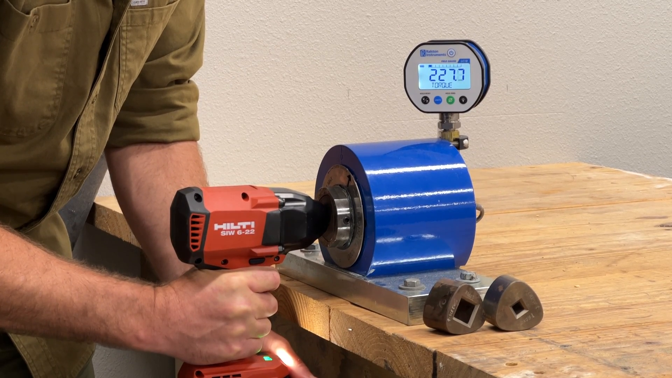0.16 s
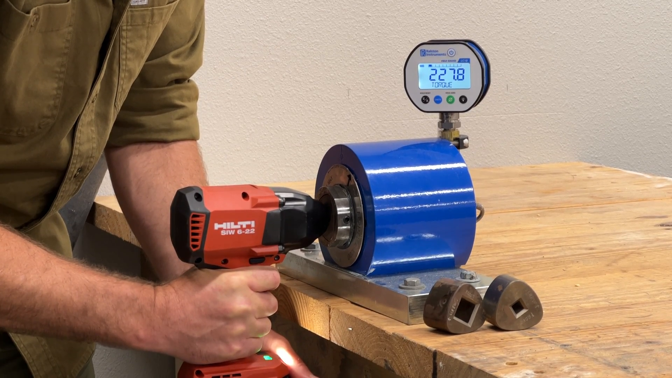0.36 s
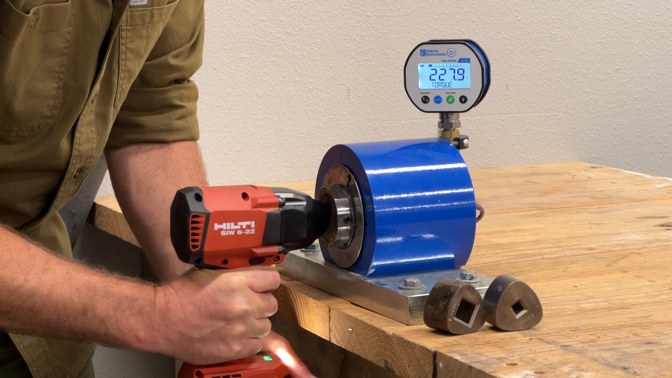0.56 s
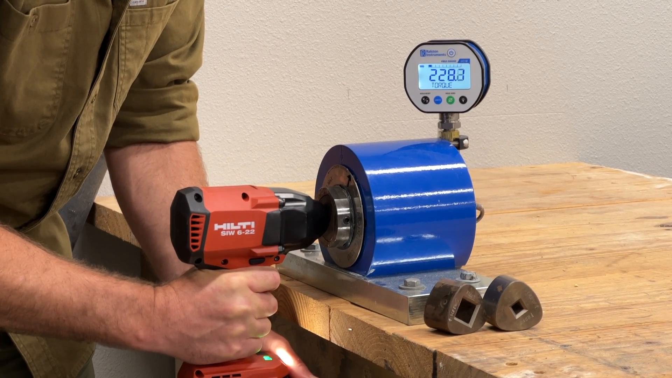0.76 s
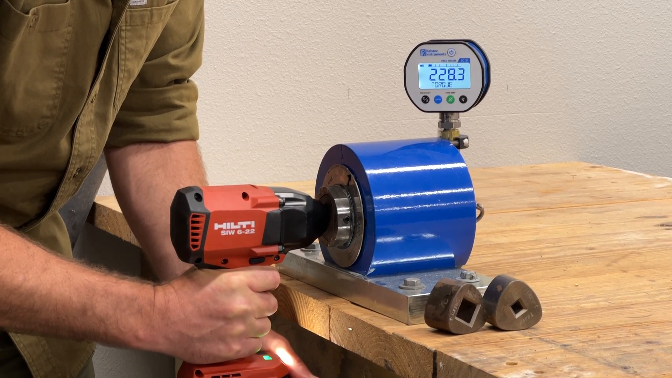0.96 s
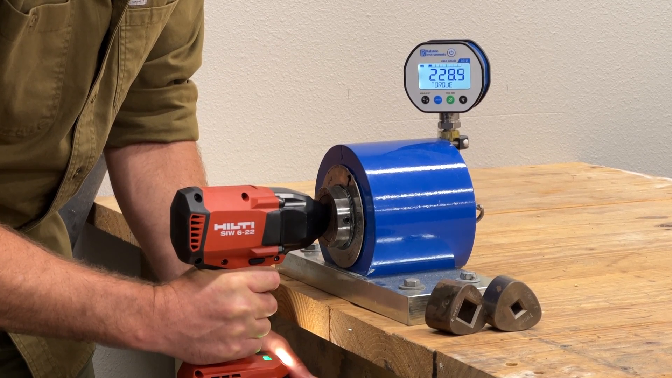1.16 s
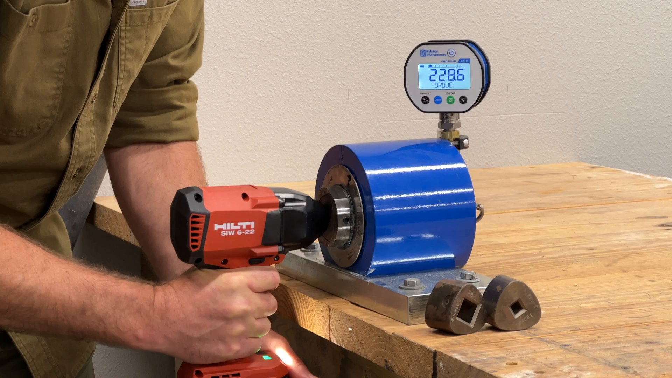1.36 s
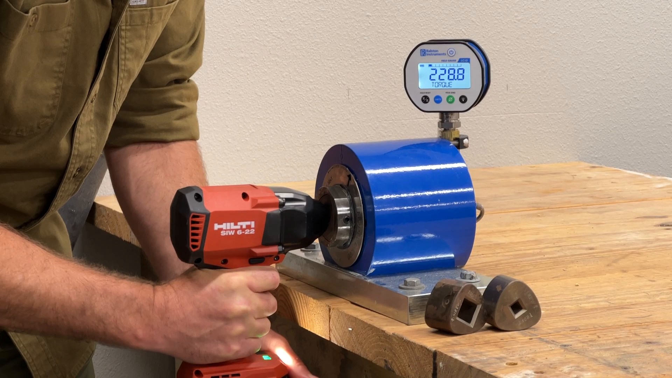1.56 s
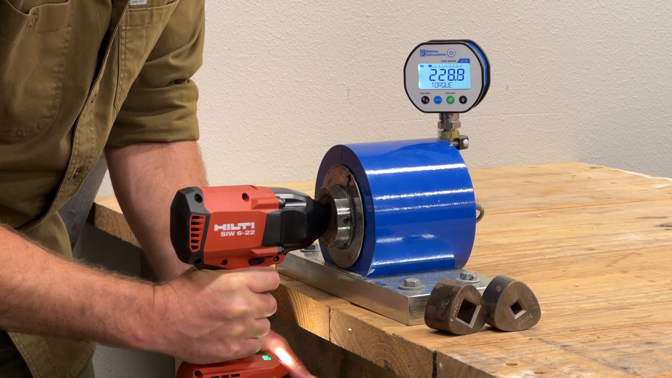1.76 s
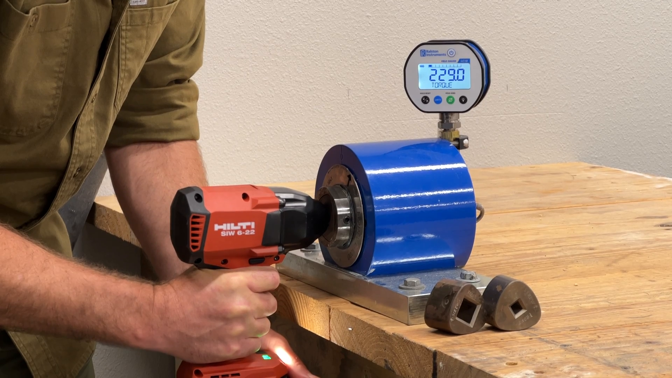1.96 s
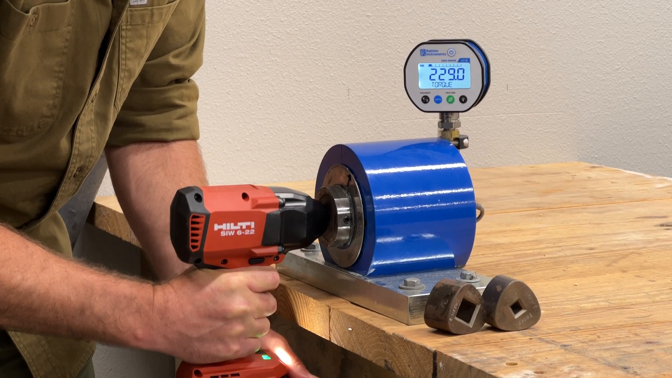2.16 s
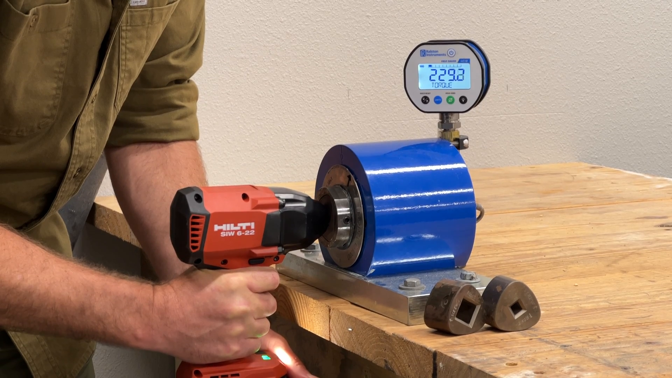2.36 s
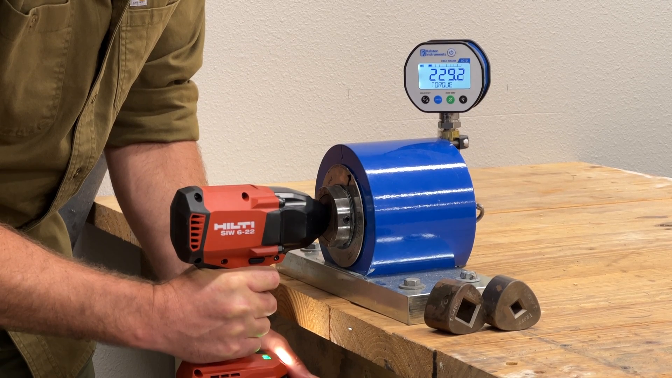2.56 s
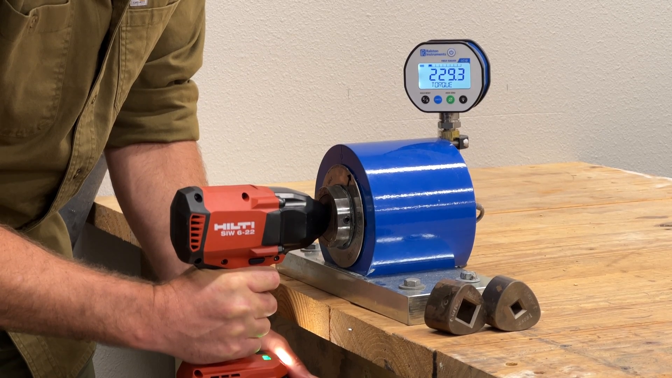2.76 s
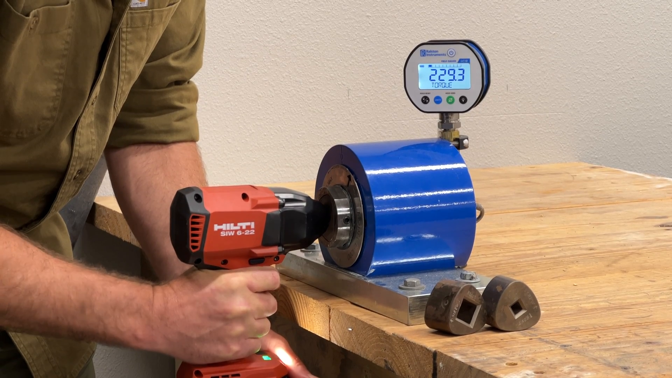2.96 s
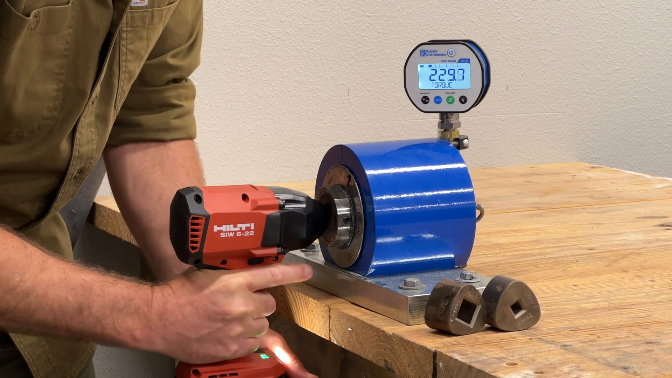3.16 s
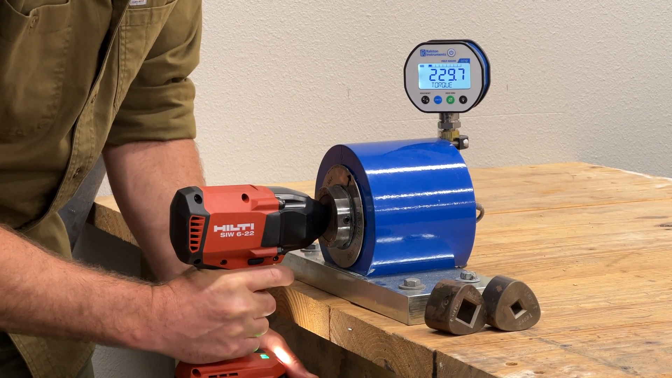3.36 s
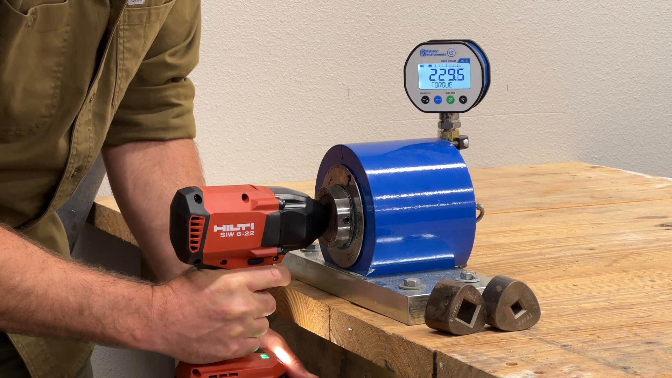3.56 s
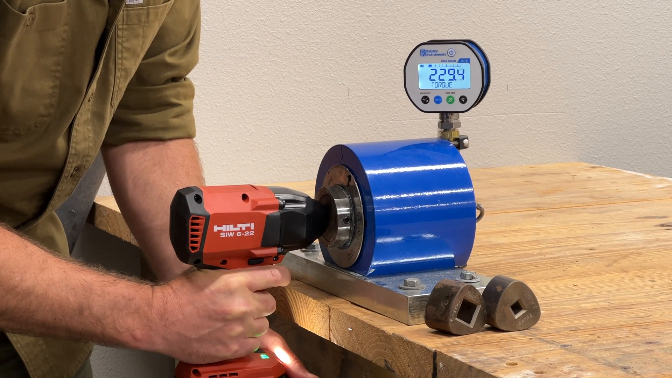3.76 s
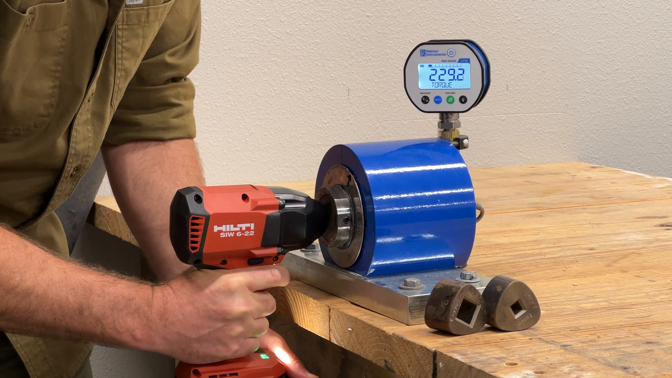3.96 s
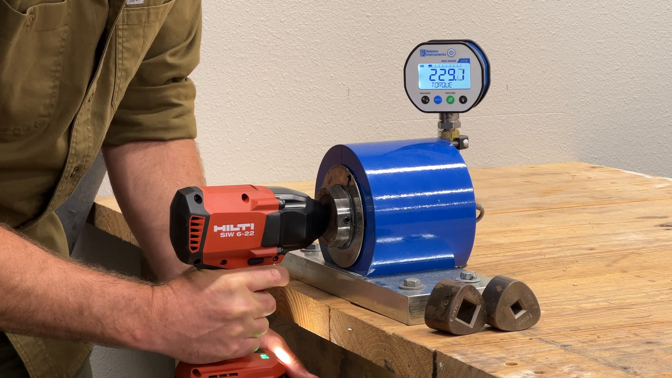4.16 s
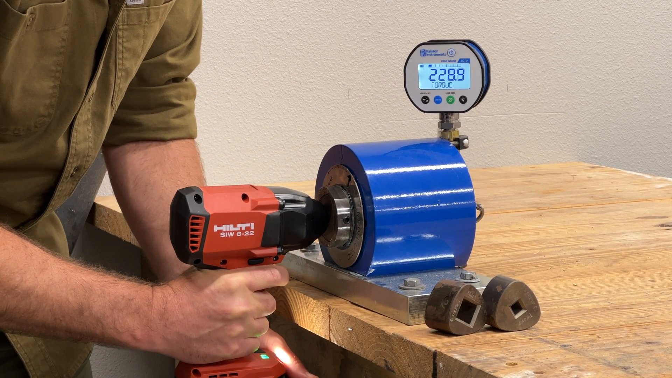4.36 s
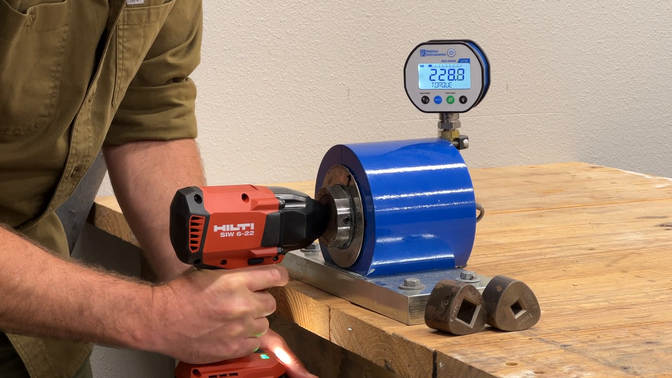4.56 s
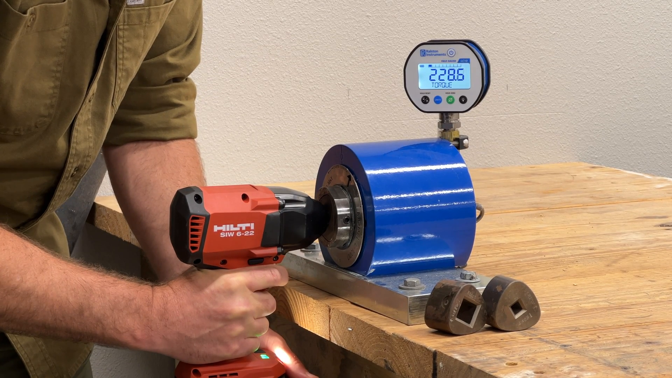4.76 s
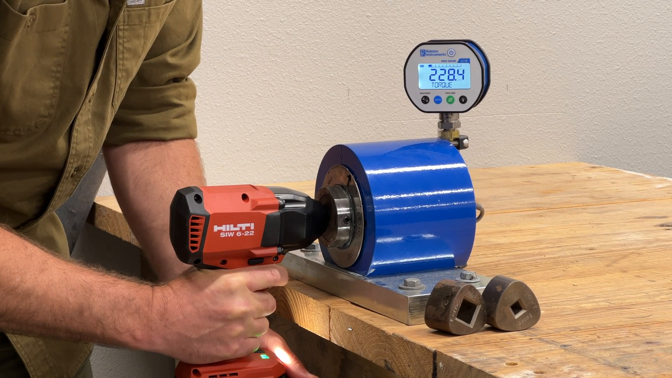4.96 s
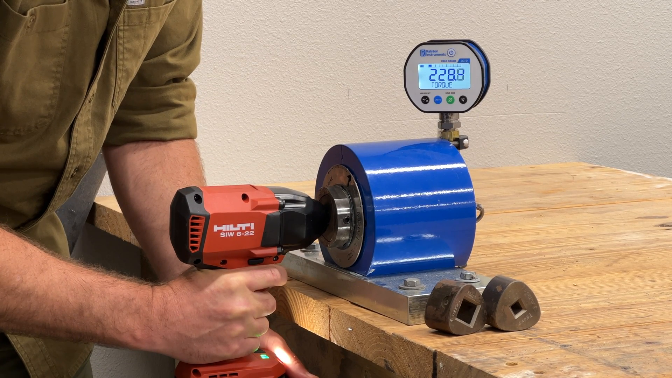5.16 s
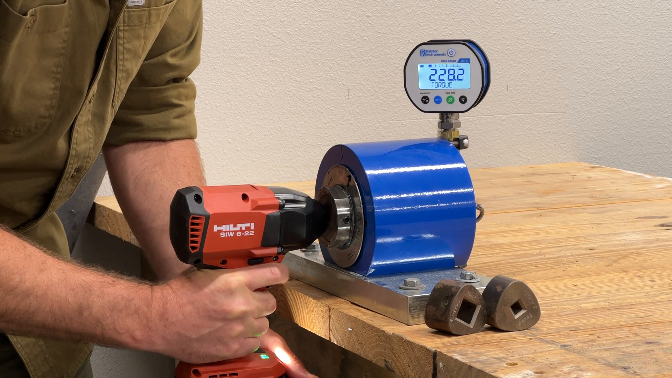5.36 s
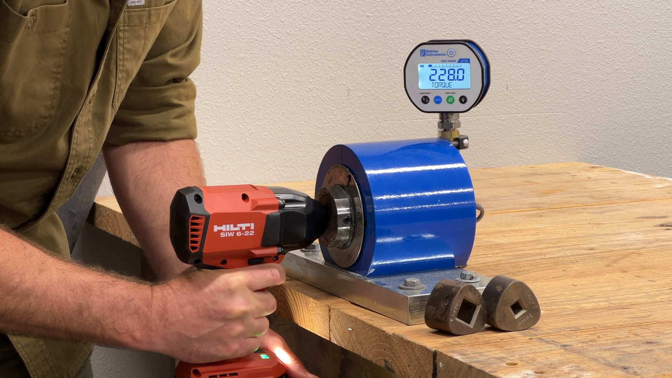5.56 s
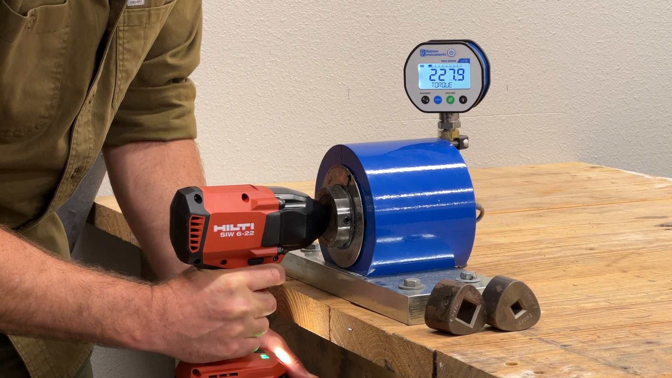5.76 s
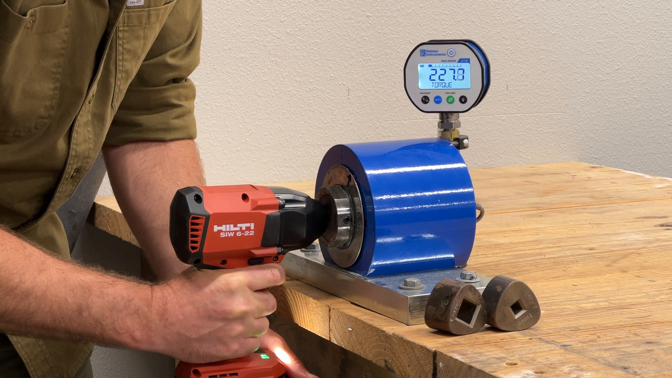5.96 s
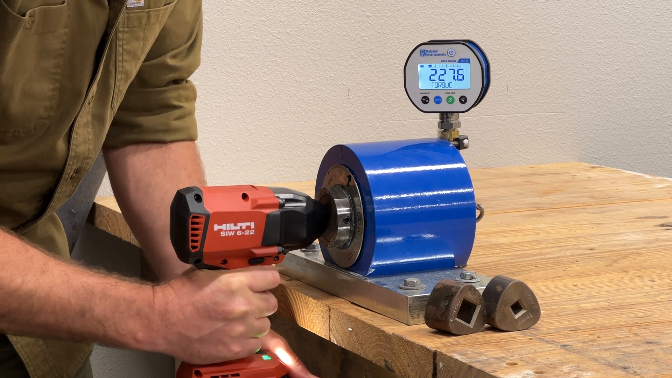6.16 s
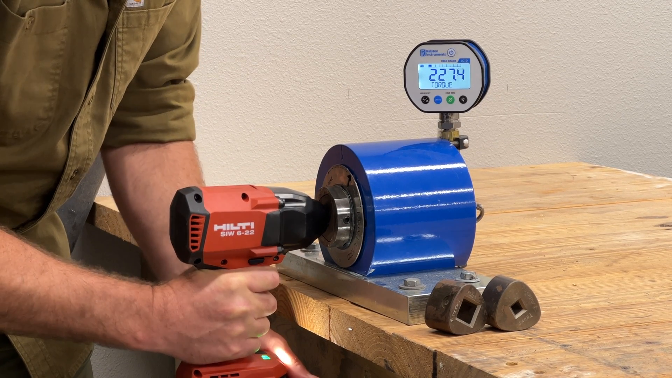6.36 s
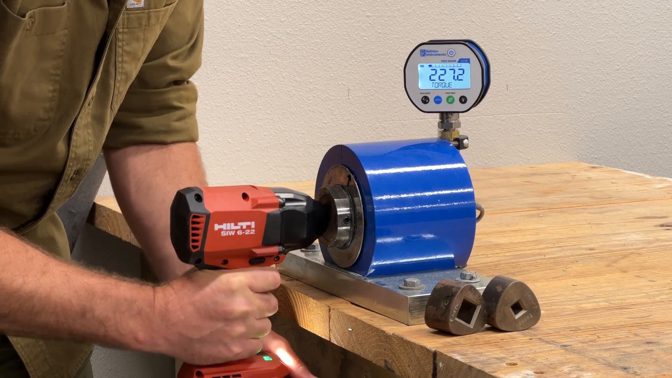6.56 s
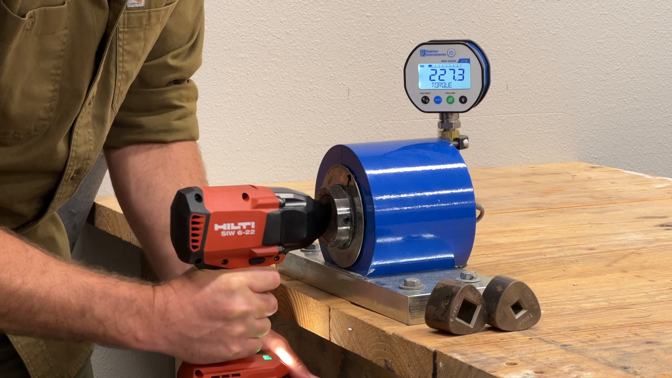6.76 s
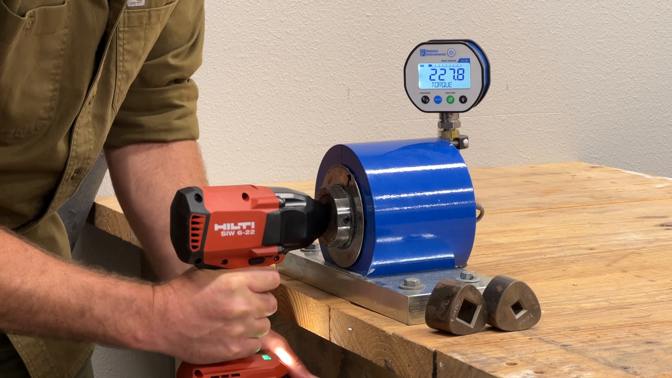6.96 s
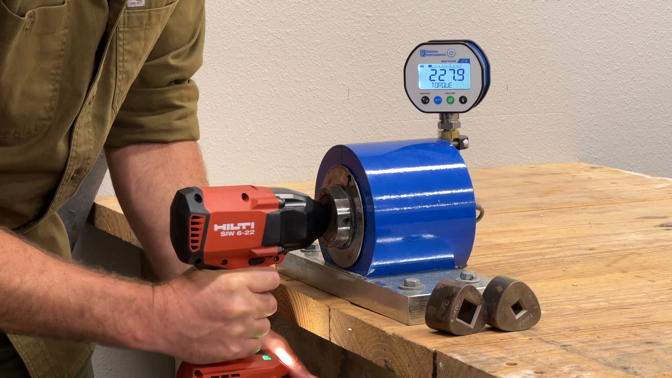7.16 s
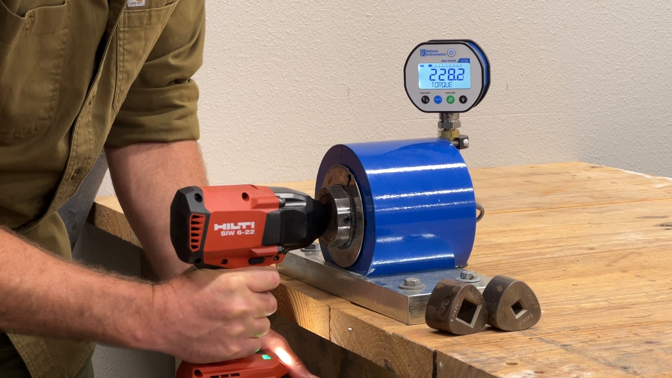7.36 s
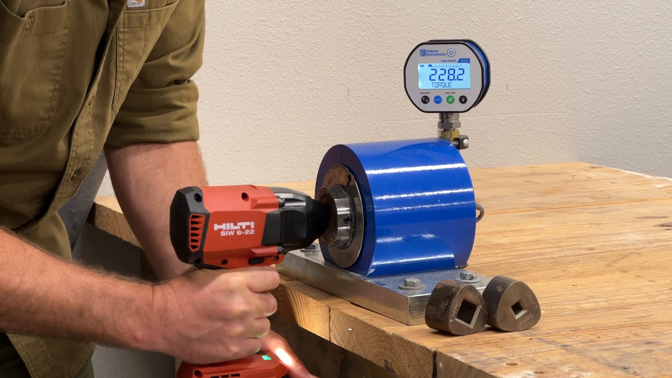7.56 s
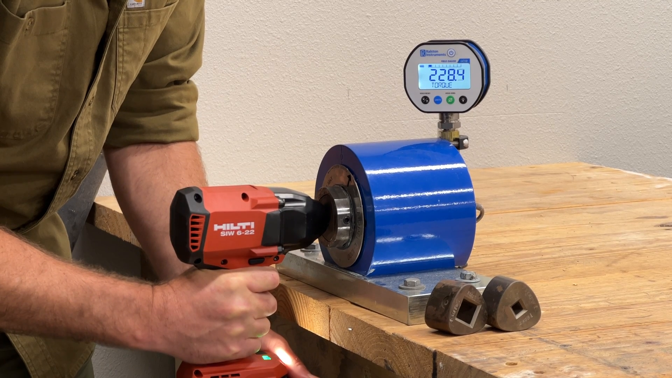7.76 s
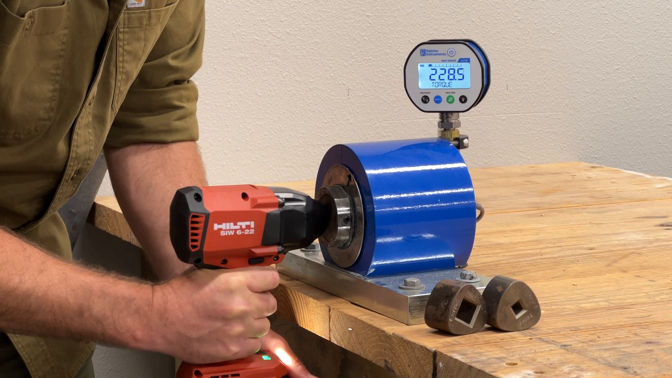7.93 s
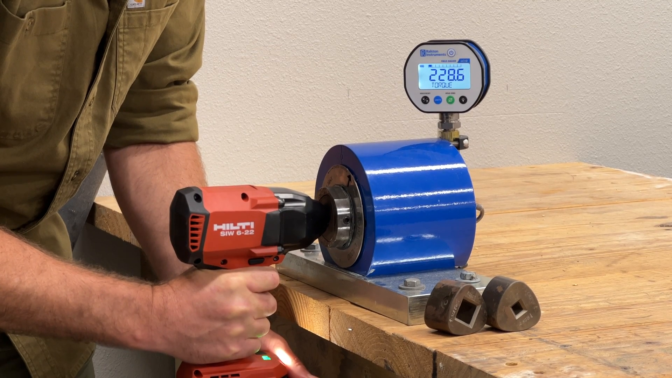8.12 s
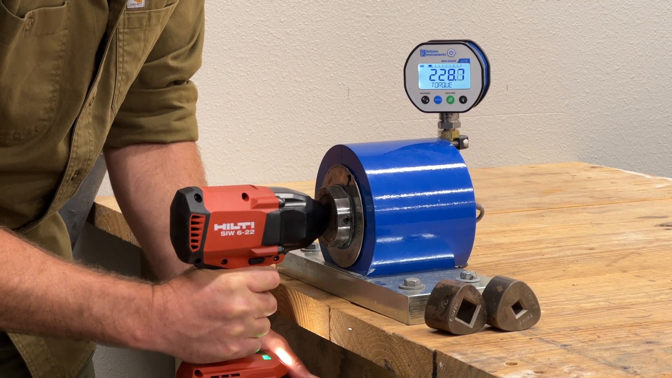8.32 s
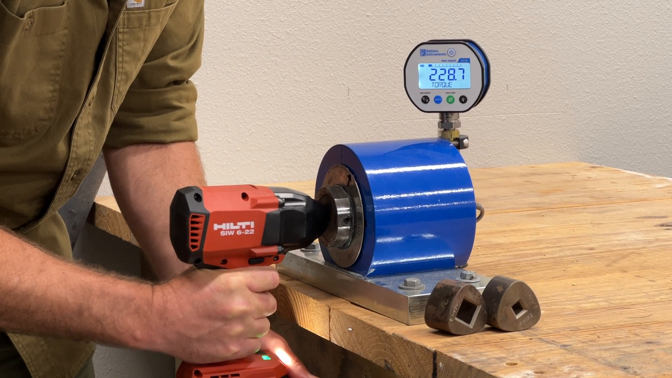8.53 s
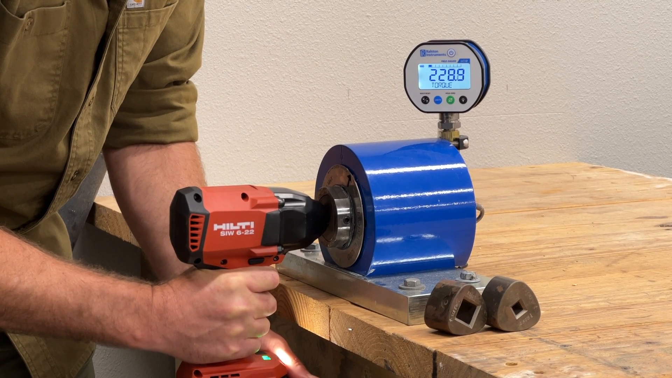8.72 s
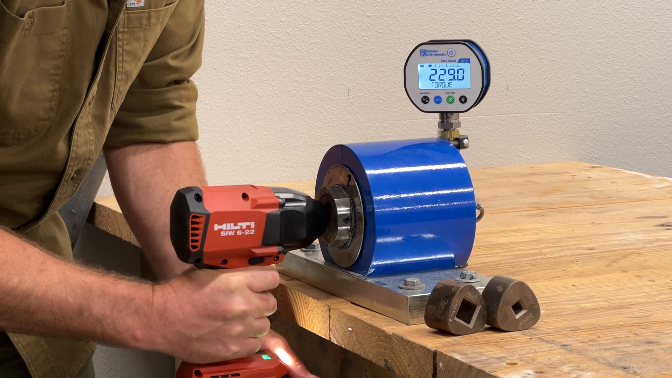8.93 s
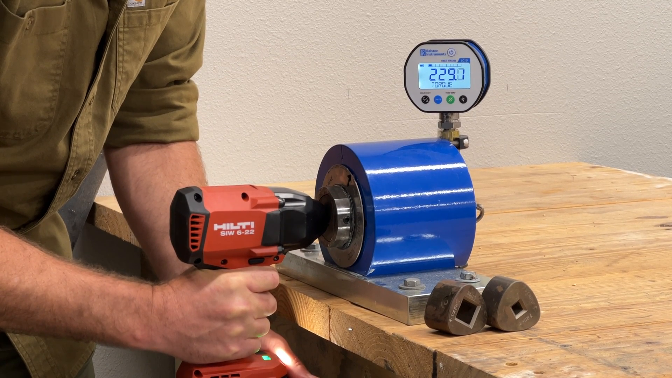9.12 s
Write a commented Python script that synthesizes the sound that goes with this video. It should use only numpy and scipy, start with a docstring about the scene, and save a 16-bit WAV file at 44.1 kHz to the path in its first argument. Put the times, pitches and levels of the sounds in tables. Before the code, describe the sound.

Two steady bursts of fast, loud steel hammering from a power wrench on a wooden bench, separated by a quiet, echoing pause with ventilation hum.

```python
"""In a live workshop, a cordless impact wrench hammers on the bolt of a tension tester clamped to a wooden bench.
Each blow, about 57 a second, excites the bench modes; the loose socket chatters on the nut until the next blow.
The hammer runs down with stray blows, the tool is shifted with clacks and ticks, and a second burst starts.
Impulses and noise drive minimum-phase resonant filters; a decaying noise tail forms the room.
Ventilation noise lies beneath, and the level of the whole scene swells and sinks between the bursts."""
import sys
import numpy as np
from scipy import signal
from scipy.fft import rfft, irfft
from scipy.io import wavfile
from scipy.ndimage import uniform_filter1d

SR = 44100
rng = np.random.default_rng(int(sys.argv[2]) if len(sys.argv) > 2 else 0)


def output_pcm(signal):
    """Save a mono or channel-first signal as 16-bit PCM at the path in sys.argv[1].

    Samples are clipped to [-1, 1] before scaling.
    """
    pcm = np.clip(np.atleast_2d(signal).T, -1, 1) * 32767
    wavfile.write(sys.argv[1], SR, np.round(pcm).astype(np.int16))


N = 409688
TIME = np.arange(N) / SR
FULL_RATE_HZ = 56.8  # blows per second at full speed

# Hammer speed in each burst, from its first blow. Each row: time in seconds, rate in blows per second.
SPEED_FIRST = [(0.002, 56.89), (0.7, 56.83), (1.5, 56.8), (2.3, 56.83), (2.97, 56.77), (3.05, 39.65),
               (3.16, 11.84)]
SPEED_SECOND = [(6.096, 42.4), (6.16, 57.18), (6.3, 56.48), (6.7, 56.96), (7.2, 56.92), (7.8, 56.77),
                (8.5, 56.75), (9.29, 56.65)]
# Seats the socket takes on the nut. Each row: start in seconds, thump level in dB,
# extra boom of the lowest bench mode in dB, chatter level in dB, drone level in dB, all relative.
SEATS = [(0, -39.5, 2.2, -38, -70), (1.7, -40, 0.5, -37, -51.5), (6, -37.5, 0.5, -33, -60.5),
         (7.15, -36.5, -1.4, -33.5, -53.5)]


def amp(db):
    """Level law: decibels to an amplitude ratio."""
    return 10 ** (np.asarray(db) / 20)


def evened(x):
    """Normalisation by effective value: scales to rms 1."""
    return x / np.sqrt(np.mean(x ** 2) + 1e-20)


def curve(rows):
    """Linear interpolation of a time table at every sample."""
    return np.interp(TIME, *np.transpose(rows))


def read(points, hz, peaks=()):
    """Source spectrum: decibels on a log-frequency axis, with resonance humps added on top."""
    f, value = np.transpose(points)
    level = np.interp(np.log(hz + 1), np.log(f + 1), value)
    for centre_hz, width_hz, db in peaks:
        level = level + db / (1 + (2 * (hz - centre_hz) / width_hz) ** 2)
    return level


def bins(size=8192):
    """Discrete spectrum: the frequencies in Hz on which filters are drawn."""
    return np.fft.rfftfreq(size, 1 / SR)


def causal(db):
    """Minimum phase: the Hilbert transform of the log gain gives a response that starts at once, energy 1."""
    log_gain = np.log(amp(np.maximum(db - db.max(), -80)))
    both_sides = np.r_[log_gain, log_gain[-2:0:-1]]
    response = np.fft.ifft(np.exp(signal.hilbert(both_sides).conj())).real
    response = response[:len(response) // 2]
    return response / np.linalg.norm(response)


def ring(x, response):
    """Linear superposition: convolves a drive with an impulse response."""
    return signal.oaconvolve(x, response)[:N]


def clicks(times, sizes):
    """Impulsive excitation: single-sample impulses at the given times in seconds."""
    places = np.clip(np.round(times * SR), 0, N).astype(int)
    return np.bincount(places, sizes, N + 1)[:N]


def crack(decay_s, spike, size=1024):
    """Impact: a sharp contact, then dense decaying ringing, with a nearly flat spectrum and energy 1."""
    t = np.arange(size) / SR
    burst = rng.standard_normal(size) * np.exp(-t / decay_s)
    burst = burst / np.linalg.norm(burst) + spike * (t == 0)
    spectrum = rfft(burst, 2 * size)
    smooth_power = uniform_filter1d(abs(spectrum) ** 2, size=12)
    burst = irfft(spectrum / np.sqrt(smooth_power))[:size]
    return burst / np.linalg.norm(burst)


def knocks(hits, decay_s, spike):
    """Isolated impacts: each hit (seconds, dB, colour in dB) is a short filtered steel crack."""
    out = np.zeros(N)
    for start_s, db, colour in hits:
        sound = amp(db) * signal.fftconvolve(crack(decay_s, spike), causal(colour))
        part = out[round(start_s * SR):][:len(sound)]
        part += sound[:len(part)]
    return out


def moments(offset, every):
    """Rate integrated to phase: times in both bursts at which the cycle, counted in blows, passes a point."""
    times = []
    for speed in (SPEED_FIRST, SPEED_SECOND):
        live = (TIME >= speed[0][0]) & (TIME <= speed[-1][0])
        blows = np.cumsum(curve(speed)[live]) / SR
        times.append(np.interp(np.arange(offset, blows[-1], every), blows, TIME[live]))
    return np.concatenate(times)


def seated(values):
    """Contact geometry: one value for each seat of the socket, sliding from seat to seat."""
    slide_s = .3
    out = values[0]
    for step, seat in zip(np.diff(values), SEATS[1:]):
        out = out + step * np.clip((TIME - seat[0]) / slide_s + .5, 0, 1)
    return out


def slack():
    """Impact strength follows speed: the share of the full speed that the hammer lacks."""
    return np.maximum(1 - curve([*SPEED_FIRST, *SPEED_SECOND]) / FULL_RATE_HZ, 0)


def envelope(rows):
    """Amplitude modulation: linear attack, hold and exponential release for each stretch (start, end, dB)."""
    attack_s, release_s = 0.02, .05
    out = 0
    for start, end, db in rows:
        rise = np.clip((TIME - start) / attack_s, 0, 1)
        out = out + amp(db) * rise * np.exp(-np.maximum(TIME - end, 0) / release_s)
    return out


def thumps(jitter_s=.00004, scatter_db=0.67, limp=0.031, spread_s=0.003217, lead_s=0.00477,
           rebound_s=0.00433, touch=0.17, level_db=1.5, slow_db=-13):
    """Modal excitation: every blow shakes tester and bench; the two hammer jaws strike unequally."""
    # Colour of bench and tester. Each row: frequency in Hz, relative density in dB per Hz.
    bench_colour = [(20, -37.5), (52, -20.5), (110, -19.5), (170, -19), (600, -18.5), (1400, -23),
                    (1650, -23), (3200, -43), (16000, -89.5)]
    # Their modes, lowest first. Each row: centre in Hz, width in Hz, height above the colour in dB.
    bench_modes = [(242.6, 109, 20.5), (452, 92, 9.5), (565, 96, 12), (708, 96, 8.5), (904, 37, 9),
                   (968, 80, 13.5), (1159, 120, 11.5), (1530, 85, 6)]
    times = moments(0, 1)
    late, size = rng.standard_normal((len(times), 2)).T
    jaw_size = 1 + limp * (-1) ** np.arange(len(times))
    # a time before the opening is mirrored to just after it
    blows = clicks(abs(times - lead_s + jitter_s * late), amp(scatter_db * size) * jaw_size)

    hz, out = bins(), np.zeros(N)
    # the upper modes answer a little after the lowest ones
    delay_s = spread_s * np.minimum(hz / 1000, 1)
    lag = np.exp(-2j * np.pi * np.cumsum(delay_s) * hz[1])
    # all-pass echo: first touch, main strike, then ever weaker rebounds
    bounce = np.exp(-2j * np.pi * hz * rebound_s)
    lag = lag * (touch + bounce) / (1 + touch * bounce)

    boom_hz, boom_width, _ = bench_modes[0]
    for (_, db, boom_db, _, _), this_seat in zip(SEATS, np.eye(len(SEATS))):
        modes = [*bench_modes, (boom_hz, boom_width, boom_db)]
        response = causal(read(bench_colour, hz, modes))
        response = irfft(rfft(response, 2 * len(response)) * lag)
        out += amp(db) * ring(blows * seated(this_seat), response)
    # a slow hammer hits softer: slow_db is the loss at standstill
    return out * np.sqrt(SR / FULL_RATE_HZ) * amp(level_db + slow_db * slack())


def chatter(jitter_s=.00011, scatter_db=1.67, decay_s=0.0021, spike=0.7, loose=0.48,
            loose_decay_s=0.0027, steady_hz=1100, level_db=-1.5, slow_db=-4):
    """Repeated contact: the socket hits nut and anvil at set points of the cycle, part same ring, part rattle."""
    # Steel contacts after every blow. Each row: share of the time to the next blow,
    # relative level in dB, brightness in dB per octave.
    contacts = [(.02, -6.5, -4), (.235, -2.5, .5), (.28, -3, -2.5), (.406, 0.3, -.5), (.45, -4.5, 0),
                (.51, -5, -0.5), (.63, -3, 3), (.75, -5.5, .5), (.865, 0, -1.5)]
    # The two jaws in turn. Each row: relative level in dB, brightness in dB per octave.
    jaws = [(1.3, -.5), (0.4, .5)]
    # Colour of socket, anvil and housing. Each row: frequency in Hz, relative density in dB per Hz.
    steel_colour = [(25, -15), (55, -8.5), (90, -7), (200, -4.5), (330, -4), (520, -4), (800, -3),
                    (1400, -4), (2400, -5), (3350, -10.5), (5000, -11.5), (8500, -14.5), (11000, -12),
                    (16000, -18)]
    # Their resonances. Each row: centre in Hz, width in Hz, height above the colour in dB.
    steel_modes = [(1772, 250, 5.6), (1984, 71, 4.8), (2770, 840, 9.1), (3670, 170, 5.2), (4160, 780, 10.9),
                   (5610, 440, 7.2), (6300, 750, 6.3), (7630, 300, 6.6), (10300, 1100, 0.91)]
    hz, out, energy = bins(), np.zeros(N), 0
    steel_db = read(steel_colour, hz, steel_modes)
    octaves = np.log2(np.clip(hz, 1000, 12000) / 3000)
    # energy decay of the rattle after each hit
    fade = np.exp(-2 * np.arange(len(hz) // 4) / SR / loose_decay_s)
    # energy share that repeats from hit to hit; the low rattle never does
    same = (1 - loose) / (1 + (steady_hz / (hz + 1)) ** 4)

    for jaw, (jaw_db, jaw_bright_db) in enumerate(jaws):
        for offset, db, bright_db in contacts:
            times = moments(jaw + offset, 2)
            late, size = rng.standard_normal((len(times), 2)).T
            hits = clicks(times + jitter_s * late, amp(db + jaw_db + scatter_db * size))
            colour = amp(steel_db + (bright_db + jaw_bright_db) * octaves)
            colour = colour / np.linalg.norm(amp(steel_db))
            same_ring = ring(hits, crack(decay_s, spike))
            rattle_power = abs(ring(hits ** 2, fade / fade.sum()))
            rattle = np.sqrt(rattle_power) * rng.standard_normal(N)
            for drive, share in ((same_ring, same), (rattle, 1 - same)):
                gain = colour * np.sqrt(share) + 1e-9
                out += np.linalg.norm(gain) * ring(drive, causal(20 * np.log10(gain)))
            energy += amp(db + jaw_db) ** 2
    seat_db = seated([db for _, _, _, db, _ in SEATS])
    return out * np.sqrt(2 * SR / FULL_RATE_HZ / energy) * amp(level_db + seat_db + slow_db * slack())


def drone(waver=0.51, decay_s=0.19, level_db=-3.0):
    """Harmonic resonance: a bench-top mode at five times the turn rate, kept swinging by the unequal jaws."""
    times = moments(0, 2)  # one turn is two blows
    t = np.arange(SR // 4) / SR
    mode = np.sin(2 * np.pi * (5 * FULL_RATE_HZ / 2) * t) * np.exp(-t / decay_s)
    pushes = clicks(times, 1 + waver * rng.standard_normal(len(times)))
    return evened(ring(pushes, mode)) * amp(level_db + seated([db for *_, db in SEATS]))


def stray_blows(level_db=15):
    """Separate impacts: single blows of a hammer that turns too slowly to keep its beat."""
    # Blows as the hammer runs down or first catches. Each row: time in seconds, relative level in dB.
    strays = [(3.103, -38), (3.107, -38), (3.114, -38), (3.149, -34), (6.065, -25.5), (6.076, -26),
              (6.09, -30), (6.101, -26), (6.108, -39), (6.123, -27)]
    # Their colour. Each row: frequency in Hz, relative density in dB per Hz.
    stray_colour = [(100, -14), (600, 3), (1300, -2.5), (2000, -1), (5000, -9), (15000, -26)]
    colour = read(stray_colour, bins())
    return amp(level_db) * knocks([(s, db, colour) for s, db in strays], decay_s=0.0034, spike=0.3)


def motor(whirr_hz=3050, width_hz=700):
    """Filtered noise: gears whirr as the motor takes up speed; the housing buzzes while the hammer turns slowly."""
    # Housing resonances. Each row: centre in Hz, width in Hz, height in dB.
    housing = [(222, 28, 17.5), (551, 89, 13), (1880, 170, 5.5)]
    # The motor spins up before the hammer catches. Each row: start and end in seconds, relative level in dB.
    spin_up = [(6.035, 6.11, -44)]
    # The slow hammer drags on its cam. Each row: start and end in seconds, relative level in dB.
    drags = [(2.975, 3.15, -42), (6.055, 6.2, -42.5)]
    # both colours in (Hz, relative dB per Hz)
    whirr_colour = [(100, 4.0), (1500, -1.0), (6000, -12), (15000, -27)]
    buzz_colour = [(30, -19), (200, 1.0), (1500, 0), (4000, -15.5), (15000, -31)]
    whirr_response = causal(read(whirr_colour, bins(), [(whirr_hz, width_hz, 14)]))
    buzz_response = causal(read(buzz_colour, bins(), housing))
    whirr = ring(rng.standard_normal(N), whirr_response) * envelope(spin_up)
    buzz = ring(rng.standard_normal(N), buzz_response) * envelope(drags)
    return whirr + buzz


def rumble():
    """Low-frequency random vibration: the bench shudders while the tool rocks."""
    # The tool rocks until the socket settles. Each row: start and end in seconds, relative level in dB.
    rocking = [(6.2, 7.08, -51)]
    # Colour of the rumble. Each row: frequency in Hz, relative density in dB per Hz.
    rumble_colour = [(15, -24), (45, -6), (75, 6), (120, -6), (300, -11), (1000, -51)]
    return ring(rng.standard_normal(N), causal(read(rumble_colour, bins()))) * envelope(rocking)


def clacks(level_db=15):
    """Impact on a resonant body: the socket knocks on the nut as the tool is shifted and set back."""
    # Each row: time in seconds, relative level in dB.
    shifts = [(3.797, -54), (4.233, -51), (4.243, -56.5), (4.31, -65)]
    # Colour of the clack. Each row: frequency in Hz, relative density in dB per Hz.
    clack_colour = [(60, -6), (250, 3), (900, -5.5), (1500, -1.5), (2600, -8), (3500, -11), (7000, -16),
                    (15000, -31.5)]
    # Its modes. Each row: centre in Hz, width in Hz, height above the colour in dB.
    clack_modes = [(714, 60, 5), (1290, 200, 7), (1710, 250, 5), (3360, 350, 5), (6050, 250, 5)]
    colour = read(clack_colour, bins(), clack_modes)
    return amp(level_db) * knocks([(s, db, colour) for s, db in shifts], decay_s=.005, spike=0.22)


def ticks(level_db=15):
    """Band-limited impacts: each small tick of socket or trigger sounds in its own band."""
    # Each row: time in seconds, relative level in dB, band centre in Hz, band width in octaves.
    small_ticks = [(3.55, -79, 10000, .25), (3.765, -72, 7000, .3), (6.023, -60, 2500, 1),
                   (6.035, -40.5, 5000, .5), (6.038, -39, 2000, .5)]
    hits = []
    for start_s, db, centre_hz, width in small_ticks:
        distance = np.log2((bins() + 1) / centre_hz) / width
        hits.append((start_s, db, -10 * np.log10(1 + distance ** 2)))
    return amp(level_db) * knocks(hits, decay_s=.0037, spike=.3)


def workshop(x, build_s=0.0084):
    """Reverberation: a dense noise tail whose decay time and strength depend on frequency."""
    # Reverberation time. Each row: frequency in Hz, time to fall by 60 dB in seconds.
    room_t60 = [(120, 1.5), (230, 1.05), (400, 0.99), (1200, 1.56), (2500, 1.15), (5000, 1.4), (8000, 0.76),
                (14000, 0.35)]
    # Strength of the echo. Each row: frequency in Hz, relative level in dB.
    room_send = [(100, -2.5), (500, 0.5), (1500, -4), (2700, -8), (4200, -5.5), (8000, -5), (14000, -9.5)]
    hz, t, noise = signal.stft(rng.standard_normal(2 * SR), SR, nperseg=256)
    t60 = read(room_t60, hz)[:, None]
    fall = np.exp(-np.log(1000) * t / t60) * (1 - np.exp(-t / build_s))
    fall /= np.sqrt((fall ** 2).sum(1, keepdims=True) * t[1] * SR)  # equal energy in every band
    tail = signal.istft(noise * fall * amp(read(room_send, hz))[:, None], SR, nperseg=256)[1]
    # the last second is played in ahead, so the room already rings at the opening
    return signal.fftconvolve(np.r_[x[-SR:], x], tail)[SR:SR + N]


def air(level_db=-75.5):
    """Duct resonance: broadband ventilation noise coloured by its duct."""
    # Colour of the ventilation. Each row: frequency in Hz, relative density in dB per Hz.
    air_colour = [(25, -15), (60, -14.5), (100, -12), (150, -3.5), (230, -4.5), (400, -8), (550, -14),
                  (800, -16.5), (1500, -29), (3000, -37.5), (6000, -41), (15000, -42)]
    # Duct resonances. Each row: centre in Hz, width in Hz, height above the colour in dB.
    duct = [(145, 20, 2), (411, 22, 11)]
    return amp(level_db) * ring(rng.standard_normal(N), causal(read(air_colour, bins(), duct)))


def scene(thump_wet_db=-11, knock_wet_db=3.5, clack_wet_db=5.5):
    """Superposition of direct and reverberant sound: bench, steel and handling share one room."""
    bench = thumps() + drone() + motor() + rumble()
    steel = chatter()
    knocking = stray_blows() + ticks()
    clacking = clacks()
    into_room = amp(thump_wet_db) * bench + steel
    into_room = into_room + amp(knock_wet_db) * knocking + amp(clack_wet_db) * clacking
    return (bench + steel + knocking + clacking + workshop(into_room) + air())[None]


def record(dry, ceiling=0.076, edge_hz=15830):
    """Gain, saturation, band limit: the level swells between bursts, peaks are rounded, the top is cut off."""
    # Gain of the whole scene, highest while the tool rests. Each row: time in seconds, gain in dB.
    swell = [(3.2, 2.5), (3.7, 5.5), (4.25, 13), (5.5, 13.5), (5.65, 8.5), (5.8, -1.5)]
    x = dry * amp(curve(swell))
    x = x / (1 + (x / ceiling) ** 4) ** (1 / 4)
    low_pass = signal.firwin(511, edge_hz, window=("kaiser", 9), fs=SR)
    return signal.oaconvolve(x, low_pass[None], "same")


dry = scene()
out = record(dry)
output_pcm(out)
```